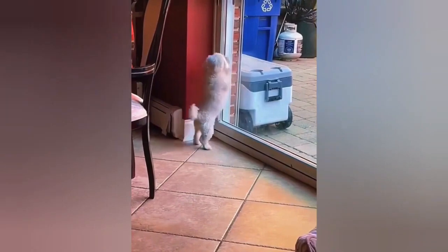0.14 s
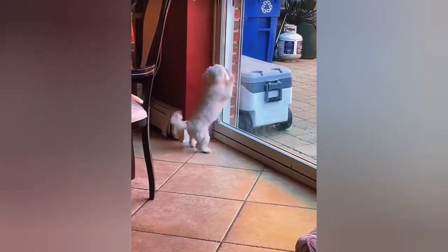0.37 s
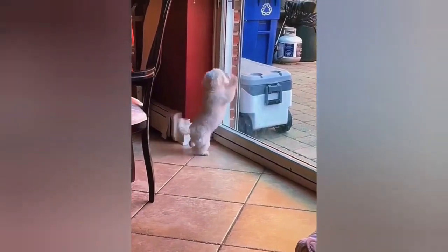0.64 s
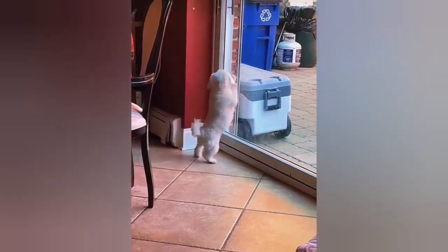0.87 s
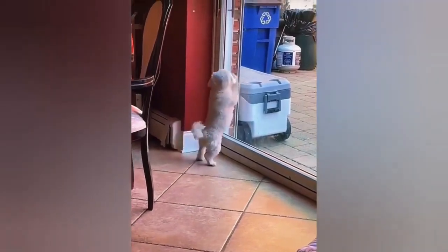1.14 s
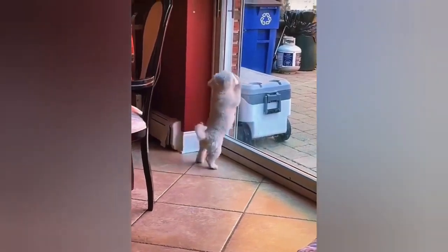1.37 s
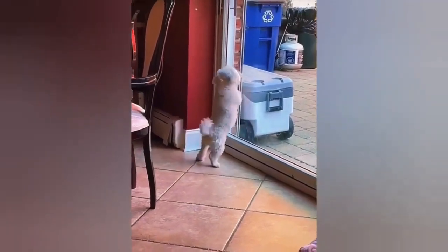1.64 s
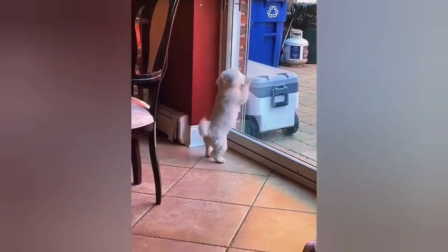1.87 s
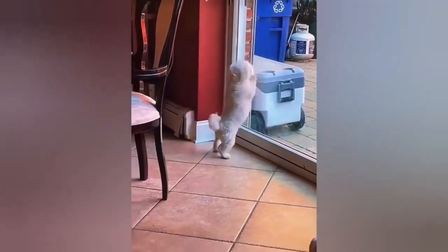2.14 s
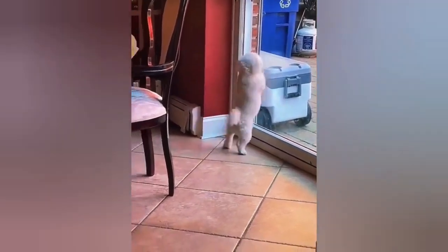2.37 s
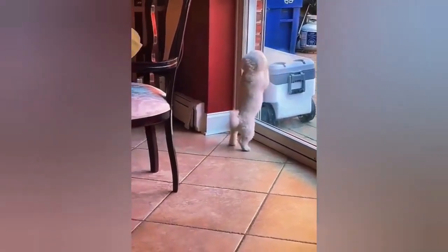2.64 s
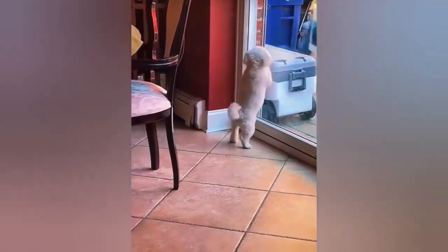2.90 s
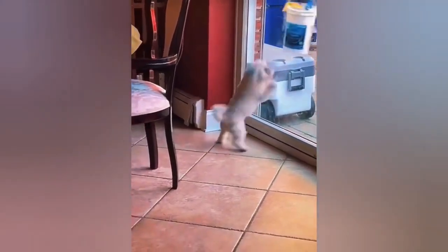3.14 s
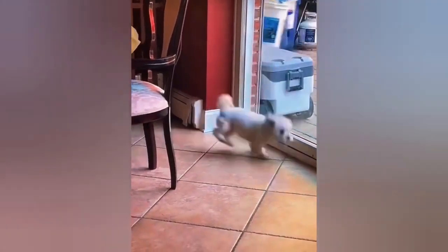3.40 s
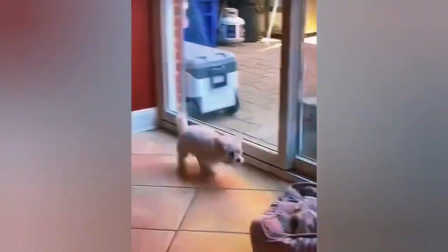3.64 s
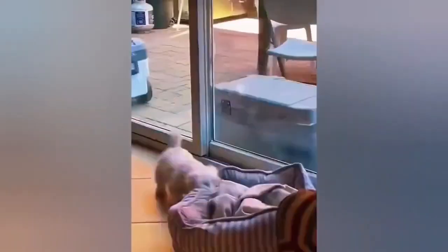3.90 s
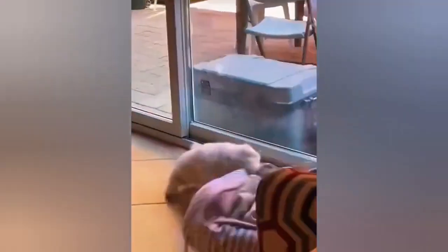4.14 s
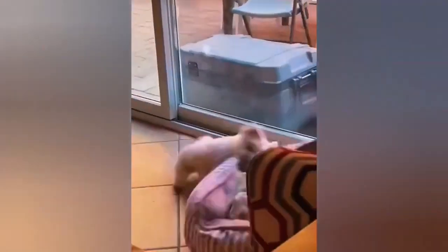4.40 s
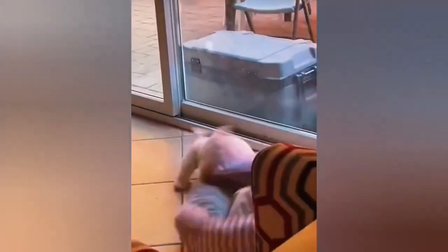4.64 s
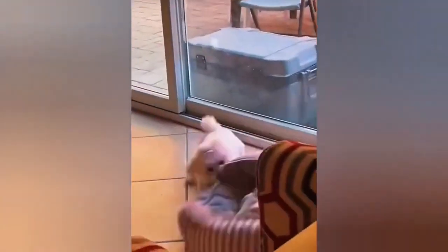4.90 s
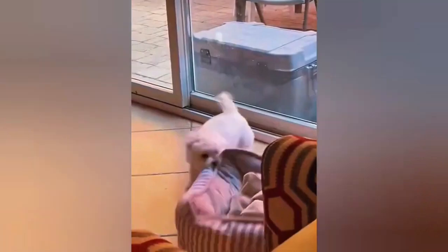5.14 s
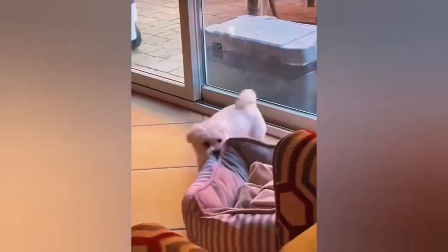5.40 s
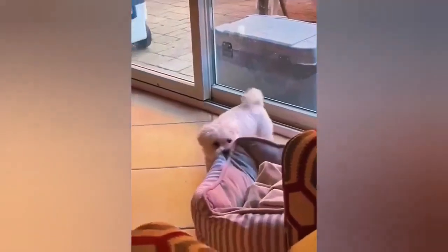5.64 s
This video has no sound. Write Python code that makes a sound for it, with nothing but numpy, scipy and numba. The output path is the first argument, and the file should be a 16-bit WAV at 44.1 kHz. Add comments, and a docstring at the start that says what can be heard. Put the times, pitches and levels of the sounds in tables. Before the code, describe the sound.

A small dog whines and yelps in long wavering cries, claws ticking on hard tile, then it digs and rustles in a soft bed.

```python
"""Small dog whining at a glass door

A small dog whines and yelps in a tiled room: rough, fluttering vocal folds through throat and mouth resonances.
Its claws tick as it dances on its hind legs: noisy cracks with short rings and bright skids.
Then it trots to a soft bed and digs: swells of coloured noise thump, drag and swish.
Echoes follow voice and claws; shaped noise hums quietly below."""
import sys
import numpy as np
from scipy import signal
from scipy.fft import rfft, irfft, next_fast_len
from scipy.io import wavfile
from scipy.ndimage import uniform_filter1d
from numba import njit

SR = 44100
rng = np.random.default_rng(int(sys.argv[2]) if len(sys.argv) > 2 else 0)


def transcribe(u):
    """Save the signal u as a 16-bit wav file named by the first command-line argument.

    u: samples, shape (n,) or (channels, n), limited to [-1, 1]; the rate is SR.
    q: integer samples, one column per channel.
    """
    v = np.clip(np.atleast_2d(u).T, -1, 1)
    q = np.round(v * 32767).astype(np.int16)
    wavfile.write(sys.argv[1], SR, q)


def volts_from_db(level):
    """Convert decibel levels to linear amplitude ratios."""
    exponent = np.asarray(level, float) / 20
    return 10 ** exponent


N = 254898
TIME = np.arange(N) / SR

# Cries, one list each. Each row: time in s, pitch in Hz, throat level in dB, open mouth in dB above the throat,
# roughness (clipped to 0-1).
CRY_CURVES = [
    [(0, 497, -12, 0.5, 0.6), (.1, 480.6, -21.5, 3.5, 0.61), (.18, 445.5, -19, -1.5, 0.34),
     (.24, 419, -18.5, 0, 0.48), (.275, 405.5, -26.5, 12.5, 0.04), (.33, 304, -33.5, 4, 0.6)],
    [(.608, 321.6, -35, 4, 0.13), (.625, 321.8, -26, -32, 0.42), (.73, 360.6, -31, -13, 0.2),
     (.77, 388, -25.5, -18, 0.32), (.84, 406, -22, -26, 0.4), (1.03, 393.8, -23.5, -27, 0.31),
     (1.11, 411.7, -19.5, -36, 0.35), (1.18, 419.7, -21, -43, 0.27), (1.24, 430, -18.5, -37, 0.34),
     (1.325, 408.2, -22.5, -15.5, 0.38), (1.37, 463.4, -18, -0.5, 0.54), (1.48, 447.6, -24.5, -4, 0.83),
     (1.71, 430.1, -24.5, 8, 0.6), (1.765, 300.7, -31.5, 6, 1.06), (1.82, 270.9, -56, -19, 0.98)],
    [(2.135, 319.4, -48, -16, 0.54), (2.15, 317.3, -29, -21, 0.71), (2.195, 350, -29, 2.5, 0.79),
     (2.28, 491.3, -16.5, 2.5, 0.38), (2.4, 560.7, -22.5, 13, .2), (2.5, 584.2, -25.5, 13, 0.34),
     (2.6, 559.2, -26, 13.5, 0.17), (2.7, 505.3, -21, 4.5, 0.32), (2.88, 429, -25.5, 5, 0.44),
     (2.96, 259.4, -35, -0.5, 0.46)],
    [(3.255, 460, -38, 17.5, 0.51), (3.272, 467.5, -28, 3.5, 0.23), (3.288, 491.2, -18, 10, .2),
     (3.305, 547.2, -19, 13, .2), (3.33, 608.4, -12, 0.5, 0.23), (3.38, 584.5, -29.5, 16, 0.5),
     (3.45, 539.4, -26.5, 9.5, 0.62), (3.56, 425, -28, 8.5, 0.86), (3.735, 330, -27.5, 3, 0.68),
     (3.9, 285.4, -39.5, -17, .52)],
    [(4.57, 334.4, -34.5, -4.5, .6), (4.605, 385.2, -24.5, -8, .5), (4.655, 420, -39.5, 11.5, 0.15),
     (4.705, 350, -28, -26, .5), (4.74, 376.5, -29, -9.5, 0.41), (4.84, 376, -29, -18.5, 0.42),
     (4.87, 335, -67, -10, .3)],
]
# Pads and fur sliding. Each row: frequency in Hz, relative density in dB per Hz.
SKID_SPECTRUM = [(5000, -9), (7000, -4), (9000, 4.5), (12000, -7), (15500, -4.5)]


def rms_one(x):
    """Scale to unit power."""
    return x / np.sqrt(np.mean(x ** 2) + 1e-20)


def in_time(rows):
    """Columns of a table as curves over every sample."""
    time_s, *columns = np.transpose(rows)
    return [np.interp(TIME, time_s, column) for column in columns]


def coloured(x, spectrum):
    """Shape by a spectrum in dB per Hz, then scale to unit power."""
    size = next_fast_len(N)
    hz, db = np.transpose(spectrum)
    log_hz = np.log(np.fft.rfftfreq(size, 1 / SR) + 1)
    shape = volts_from_db(np.interp(log_hz, np.log(hz), db))
    return rms_one(irfft(rfft(x, size) * shape, size)[:N])


def drift(rate_hz):
    """Slow chance: noise twice through a one-pole low-pass, scaled to unit power."""
    r = np.exp(-2 * np.pi * rate_hz / SR)
    noise = rng.standard_normal(N + SR)
    return rms_one(signal.lfilter([1], [1, -2 * r, r * r], noise)[SR:])  # first second settles


@njit
def glide(x, hz, r, rate):
    """One two-pole resonance whose centre moves sample by sample."""
    out = np.zeros(len(x))
    for i in range(2, len(x)):
        drive = (1 - r * r) / 2 * (x[i] - x[i - 2])
        turn = 2 * r * np.cos(2 * np.pi * hz[i] / rate)
        out[i] = drive + turn * out[i - 1] - r * r * out[i - 2]
    return out


def resonate(x, modes, scale):
    """Parallel resonances with alternating signs, each applied twice for dark valleys."""
    out = 0
    for k, (centre, width_hz, db) in enumerate(modes):
        r = np.exp(-np.pi * width_hz / SR)
        hz = centre * scale
        once = glide(x, hz, r, SR)
        out = out + (-1) ** k * volts_from_db(db) * glide(once, hz, r, SR)
    return out


def evened(x):
    """Hold the level near 1 over a short window."""
    return x / np.sqrt(uniform_filter1d(x ** 2, size=3500) + 1e-9)


def manner(pitch_hz):
    """Which cry sounds, and its flutter, mouth resonance and rasp at every sample."""
    # One row per cry: flutter per s, flutter depth, mouth resonance in Hz at the highest pitch,
    # how far it follows the pitch (0-1), rasp in dB below the mouth, strong-weak alternation of rough pulses.
    manners = [(42.08, 0.23, 1350, 0.04, -17, 0), (45, 0.76, 1338, 0.06, -20, 0.3),
               (142.5, 0.96, 1354, 0.08, -31, 0.2), (45.9, 0.82, 1670, 0.44, -47, 1.03),
               (17.94, 1.26, 1325, 0.28, -18, 0)]
    flutter_swell_s, flutter_at_edges = 0.15, 0.1
    sounding, rate, depth, mouth_hz, rasp_db, alternation = np.zeros((6, N))
    for cry, (per_s, deep, top_mouth_hz, follows, cry_rasp_db, alternates) in zip(CRY_CURVES, manners):
        start_s, end_s = cry[0][0], cry[-1][0]
        top_hz = max(row[1] for row in cry)
        since = TIME >= start_s
        # flutter grows in after the onset and fades before the end
        grown = np.clip(np.minimum(TIME - start_s, end_s - TIME) / flutter_swell_s, 0, 1)
        cry_depth = deep * (flutter_at_edges + (1 - flutter_at_edges) * grown)
        sounding = sounding + since * (TIME < end_s)
        rate = np.where(since, per_s, rate)
        depth = np.where(since, cry_depth, depth)
        mouth_hz = np.where(since, top_mouth_hz * (pitch_hz / top_hz) ** follows, mouth_hz)
        rasp_db = np.where(since, cry_rasp_db, rasp_db)
        alternation = np.where(since, alternates, alternation)
    return sounding, rate, depth, mouth_hz, rasp_db, alternation


def voice():
    """Vocal folds with jitter, a second slower flutter and gated air, heard through throat and mouth."""
    # Each row: centre in Hz, width of one pass in Hz, level in dB.
    throat_modes = [(443, 286, 2.5), (750, 830, -7)]
    # Each row: multiple of the mouth resonance, width of one pass in Hz, level in dB.
    mouth_modes = [(.55, 432, 5), (0.76, 337, 8.5), (0.998, 301, 18), (1.33, 400, 1.5), (2.0, 302, -33)]
    # High resonances of the open mouth. Each row: centre in Hz, width of one pass in Hz, level in dB.
    rasp_modes = [(2220, 530, -1), (2780, 350, 2), (3830, 770, -6.5)]
    # Air noise of the open mouth. Each row: frequency in Hz, relative density in dB per Hz.
    breath_spectrum = [(1180, -51.5), (2000, 0), (2200, -13.5), (2840, -9.5), (4180, -15), (4710, -16),
                       (6200, -16.5), (7290, -21.5), (7950, -33.5), (9680, -21.5), (15500, -37.5)]
    muzzle_cut_hz = 2050
    nasal_fades_db_per_db, nasal_fades_from_db = 0.36, -14.5

    pitch_hz, throat_db, mouth_db, rough = in_time(sum(map(list, CRY_CURVES), []))
    sounding, rate, depth, mouth_hz, rasp_db, alternation = manner(pitch_hz)
    sounding = uniform_filter1d(sounding * 1., size=400, mode="nearest")
    rough, depth = np.clip(rough, 0, 1), np.clip(depth, 0, 1.5)

    jitter = .04 * rough * drift(44.63) + 0.00803 * drift(6.42)
    phase = 2 * np.pi * np.cumsum(pitch_hz * (1 + jitter)) / SR
    # a slower wobble swings level and timing together: side lines, the upper one stronger
    wander = 0.603 * rough * np.clip(50 / rate, 0, 1) * drift(12.01) + 0.0379 * drift(4.61)
    flutter = 2 * np.pi * np.cumsum(rate * (1 + wander)) / SR
    swing = 0.74 * depth * np.sin(flutter)
    pulses = sum(np.cos(k * phase + swing) / k ** .7 for k in np.arange(1, 9))
    pulses = pulses * (1 + depth * np.cos(flutter))
    pulses = pulses * (1 + alternation * rough ** 2 * np.cos(phase / 2))
    pulses = pulses * volts_from_db(3.8 * rough * drift(32))  # uneven strength from cycle to cycle
    air = (1 + 0.68 * np.cos(phase)) * rng.standard_normal(N)
    puffs = pulses + 4.0 * rough ** 1.5 * air

    # the upper throat resonance weakens as the mouth opens
    nasal = volts_from_db(-nasal_fades_db_per_db * np.clip(mouth_db - nasal_fades_from_db, 0, None))
    steady = np.ones(N)
    lower_throat = resonate(puffs, throat_modes[:1], steady)
    upper_throat = resonate(puffs, throat_modes[1:], steady)
    throat = evened(lower_throat - nasal * upper_throat)
    rasp = volts_from_db(rasp_db) * evened(resonate(puffs, rasp_modes, steady))
    mouth = resonate(pulses + 8.0 * rough ** 1.5 * air, mouth_modes, mouth_hz)
    muzzle = signal.butter(4, muzzle_cut_hz, fs=SR, output="sos")
    mouth = evened(signal.sosfilt(muzzle, mouth))
    # breath follows mouth and roughness above a floor
    breath = coloured(air, breath_spectrum) * (volts_from_db(-32.5 + mouth_db + 15.0 * rough) + volts_from_db(-30.5))
    return sounding * volts_from_db(throat_db) * (throat + volts_from_db(mouth_db) * (mouth + rasp) + breath)


def hum():
    """The quiet room: broad noise and a low noise drone near 60 Hz."""
    # Each row: frequency in Hz, relative density in dB per Hz.
    hum_spectrum = [(15, -70.5), (25, -30), (54, -9.5), (127, -11), (147, -12.5), (284, -11.5), (359, -18),
                    (465, -21.5), (2010, -35.5), (7000, -41), (9100, -84.5), (15400, -120)]
    hum_db, drone_db = -49.5, -50
    drone_spectrum = [(30, -33.5), (58, 14.5), (90, -6), (200, 1.0), (400, -34)]
    drone = coloured(rng.standard_normal(N), drone_spectrum)
    broad = coloured(rng.standard_normal(N), hum_spectrum)
    return volts_from_db(hum_db) * broad + volts_from_db(drone_db) * drone


def room(x):
    """A dense noise tail that builds up over a few ms, with separate decays for bass and treble."""
    bass_t60_s, treble_t60_s, split_hz, build_s = 0.5, 0.57, 1570, 0.0065
    after = TIME[:SR]
    low, high = [signal.sosfilt(signal.butter(2, split_hz, kind, fs=SR, output="sos"), rng.standard_normal(SR))
                 for kind in ("low", "high")]
    tail = low * volts_from_db(-60 * after / bass_t60_s) + high * volts_from_db(-60 * after / treble_t60_s)
    tail = tail * np.clip(after / build_s, 0, 1) ** 2
    power = np.sum(volts_from_db(-120 * after / bass_t60_s))
    return signal.fftconvolve(x, tail / np.sqrt(power))[:N]


def skidding(after):
    """Envelope of a bright skid: a quick burst and a longer hiss."""
    return np.exp(-after / 0.0019) + 1.8 * np.exp(-after / 0.033)


def claws():
    """Each tick is a cluster of nails: a noisy crack, two bouncing rings, a dying scuff and a bright skid."""
    # Claws on tile and glass. Each row: time in s, relative level in dB, ring in Hz.
    ticks = [(0.183, -12.5, 4470), (0.268, -12, 3040), (0.3411, -17, 4060), (0.4748, -21, 3900),
             (0.8024, -20.5, 4350), (0.9308, -22, 4410), (1.047, -22, 3823), (1.1815, -17.5, 4460),
             (1.3483, -12, 4660), (1.4975, -12, 3851), (1.6459, -5.5, 4245), (1.7861, -9, 4150),
             (1.9894, -11.5, 4246), (2.2329, -15.5, 3803), (2.381, -9, 4195), (2.575, -17.5, 3433),
             (2.7852, -20.5, 4956), (2.9372, -24, 4124), (3.234, -12, 5323), (3.5186, -31.5, 3693)]
    # Each row: frequency in Hz, relative density in dB per Hz.
    crack_spectrum = [(590, -43), (1000, -12), (1380, -9.5), (1900, -1.5), (2250, 0.5), (2630, -2.5),
                      (3690, 3), (9000, -15), (11700, -32), (19800, -120)]
    # Pads skid as it trots away. Each row: time in s, relative level in dB.
    pad_skids = [(3.3994, -53), (3.6794, -43), (3.7174, -46.5), (3.819, -51.5), (3.908, -43)]
    lead_s, tick_skid_db = .003, -37.5  # sounds begin lead_s before the listed time
    noise = coloured(rng.standard_normal(N), crack_spectrum)
    skid = coloured(rng.standard_normal(N), SKID_SPECTRUM)
    out = np.zeros(N)
    for s, db, ring_hz in ticks:
        after = np.clip(TIME - s + lead_s, 0, None)
        rise = 1 - np.exp(-(after / 0.0059) ** 2)
        crack = noise * (np.exp(-after / 0.003) + volts_from_db(-11.5) * np.exp(-after / 0.033))
        bounces = np.exp(-((after - .004) / .0012) ** 2) + .6 * np.exp(-((after - .008) / .001) ** 2)
        ring = 1.02 * bounces * np.sin(2 * np.pi * ring_hz * after)
        tick = volts_from_db(db - 6) * (crack + ring)
        out += rise * (tick + volts_from_db(db + tick_skid_db) * skid * skidding(after))
    for s, db in pad_skids:
        after = np.clip(TIME - s + lead_s, 0, None)
        rise = 1 - np.exp(-(after / 0.0053) ** 2)
        out += volts_from_db(db) * rise * skidding(after) * (skid + volts_from_db(1) * noise)
    return out


def swell(s, db, hold_s, attack_s, t60_s):
    """Rise into the moment s, hold, then die away, slowly at first and then faster."""
    after = TIME - s
    fall_db = 60 * (np.clip(after - hold_s, 0, None) / t60_s) ** 1.35
    return volts_from_db(db - fall_db) * np.clip(1 + after / attack_s, 0, 1) ** 2


def digging():
    """Paws thump softly on floor and cushion while the cloth drags and swishes in lumps."""
    # Three spectra. Each row: frequency in Hz, relative density in dB per Hz.
    thump_spectrum = [(30, -21), (60, 2), (120, 6), (200, 3.5), (350, -1.5), (600, -40)]
    cloth_spectrum = [(200, -9), (350, 3.5), (600, 3), (1000, -0.5), (1600, -29), (3500, -62)]
    swish_spectrum = [(590, -28), (1000, -33), (1120, -3.5), (1600, 1), (1930, -1), (2280, -2),
                      (6500, -15.5), (8450, -27), (14300, -120)]
    # Paws and body land. Each row: time of full level in s, level in dB, hold in s.
    landings = [(3.775, -37, .12), (3.926, -39, 0.074), (4.052, -27, 0.14), (4.318, -38.5, .03),
                (4.413, -50, .02), (4.494, -34.5, 0.021), (4.566, -39, 0.12), (4.786, -35, .1),
                (4.958, -32.5, 0.045), (5.32, -36.5, 0.014)]
    # Paw strokes through the cloth. Each row: time of full level in s, swish level in dB,
    # cloth drag in dB above it, rise in s, hold in s.
    strokes = [(3.947, -31.5, -1.5, .015, 0.061), (4.309, -49.5, -1, 0.067, .02),
               (4.424, -51, 5.5, 0.045, .02), (4.594, -40.5, 2.5, 0.096, 0.051),
               (4.86, -30.5, -5.5, 0.076, .03), (4.989, -41.5, -1, .04, 0.032),
               (5.326, -41, 0, 0.067, 0.013), (5.737, -61, -13.5, 0.042, 0.047)]
    landing_attack_s, landing_t60_s = 0.039, 0.23
    swish_t60_s, drag_t60_s, skid_t60_s, skid_db = 0.42, 0.49, 0.34, -15
    thump, cloth, swish, skid = [coloured(rng.standard_normal(N), spectrum) for spectrum in
                                 (thump_spectrum, cloth_spectrum, swish_spectrum, SKID_SPECTRUM)]
    lumps = volts_from_db(2.0 * drift(14) + 1.24 * drift(150))
    thumps = thump * sum(swell(s, db, hold_s, landing_attack_s, landing_t60_s) for s, db, hold_s in landings)
    rubbing = np.zeros(N)
    for s, db, drag_db, rise_s, hold_s in strokes:
        rubbing += cloth * swell(s, db + drag_db, hold_s, rise_s, drag_t60_s)
        rubbing += swish * swell(s, db, hold_s, rise_s, swish_t60_s)
        rubbing += skid * swell(s, db + skid_db, hold_s, rise_s, skid_t60_s)
    return thumps + lumps * rubbing


def scene():
    """The dog with its echoes, the digging and the hum, in one channel."""
    dog = voice() + claws()
    echoes = volts_from_db(-2) * room(dog)
    return (dog + echoes + digging() + hum())[None]


def band_limit(x):
    """A steep low-pass at the top of the band."""
    return signal.sosfilt(signal.butter(12, 15700, fs=SR, output="sos"), x)


def record(dry):
    """Soft saturation rounds the loudest peaks of the finished mix."""
    rounded = 1.25 * np.tanh(dry / 1.25)
    return band_limit(rounded)


dry = scene()
out = record(dry)
transcribe(out)
```